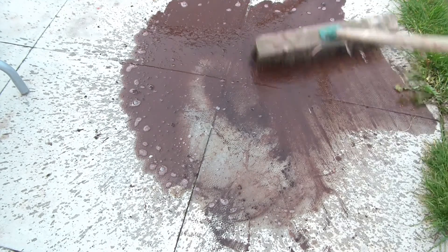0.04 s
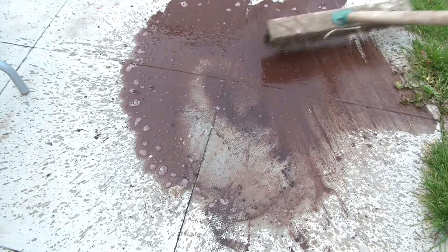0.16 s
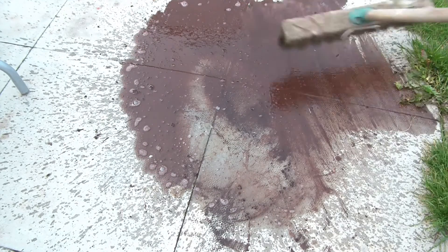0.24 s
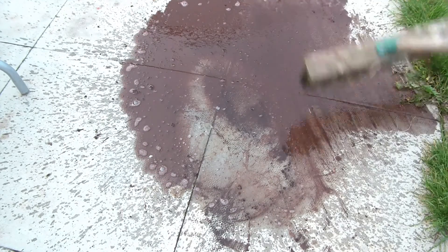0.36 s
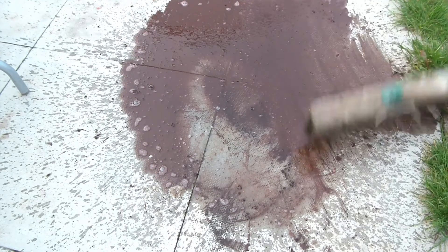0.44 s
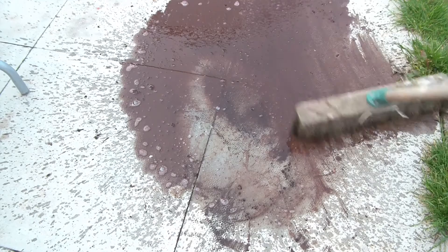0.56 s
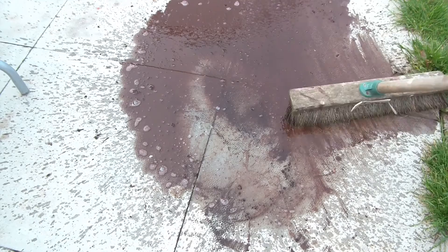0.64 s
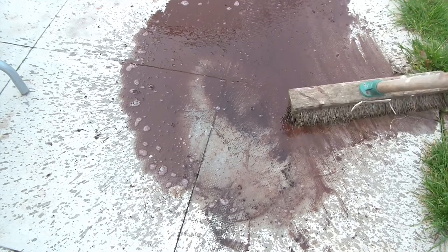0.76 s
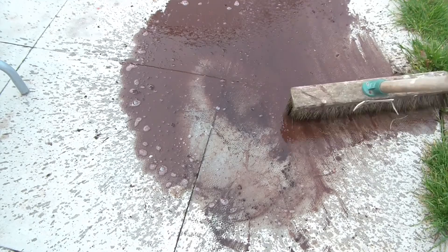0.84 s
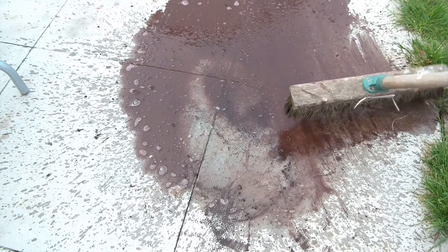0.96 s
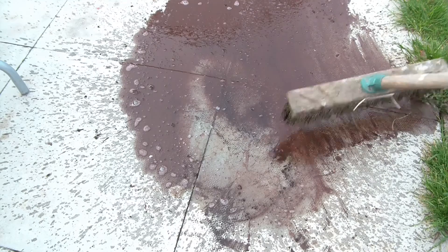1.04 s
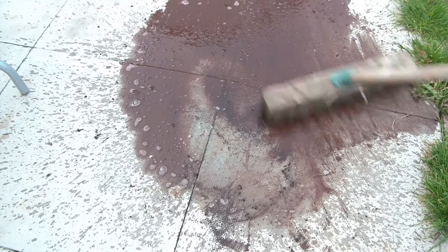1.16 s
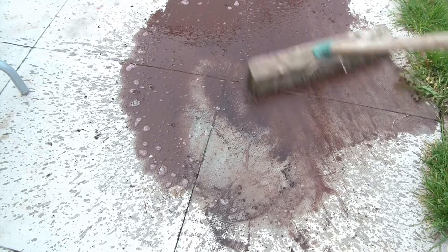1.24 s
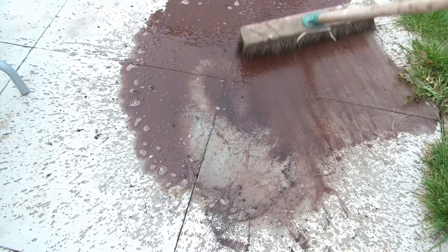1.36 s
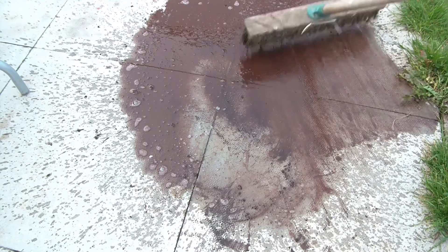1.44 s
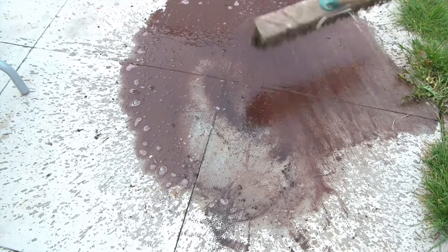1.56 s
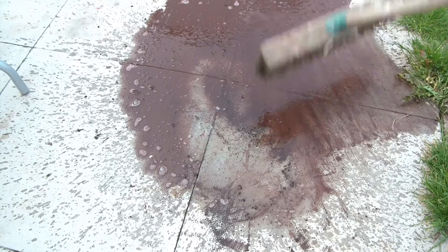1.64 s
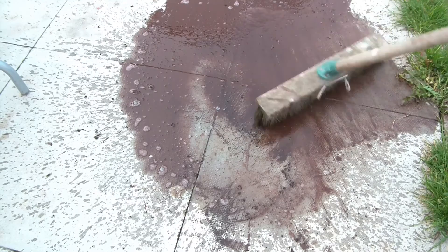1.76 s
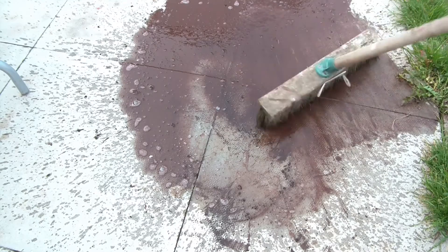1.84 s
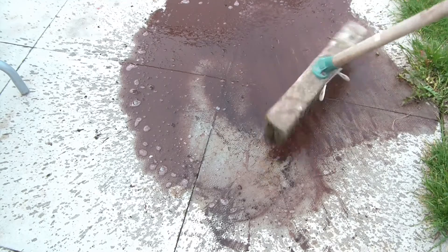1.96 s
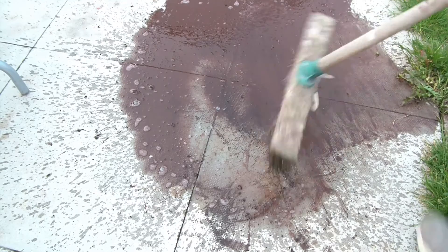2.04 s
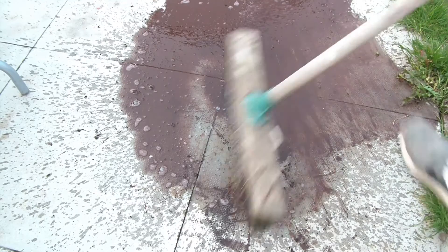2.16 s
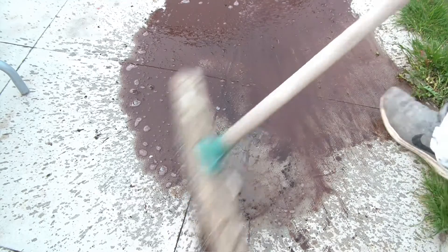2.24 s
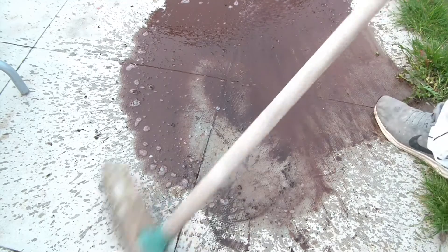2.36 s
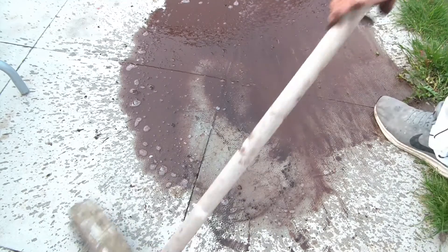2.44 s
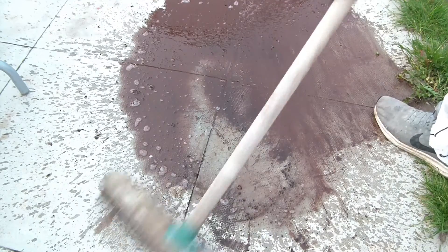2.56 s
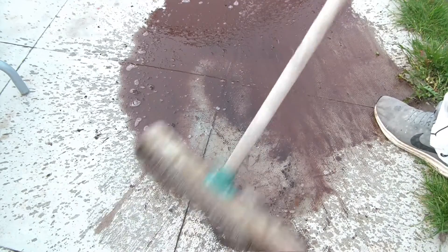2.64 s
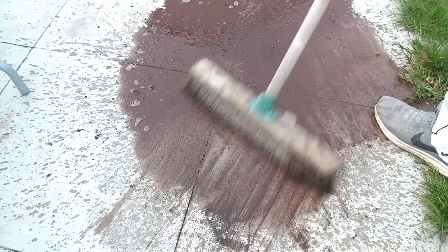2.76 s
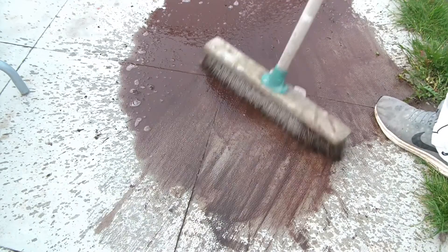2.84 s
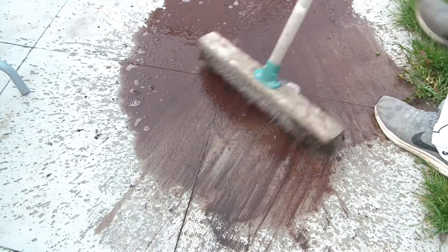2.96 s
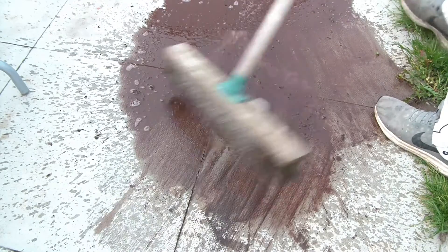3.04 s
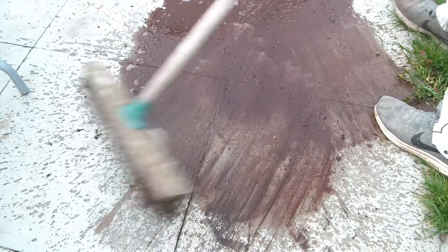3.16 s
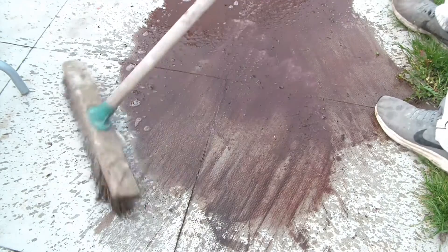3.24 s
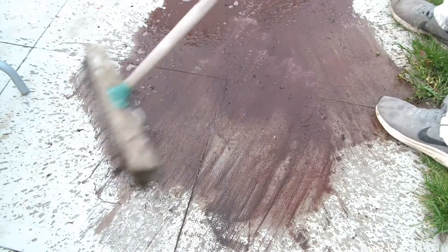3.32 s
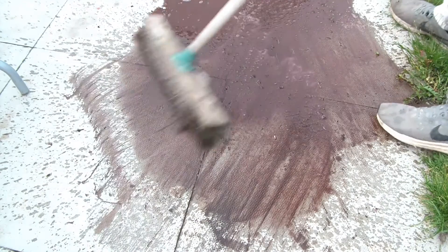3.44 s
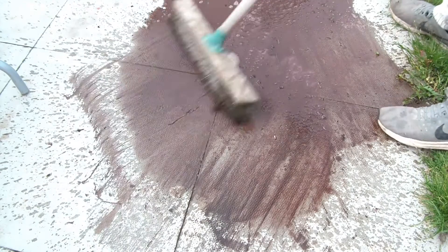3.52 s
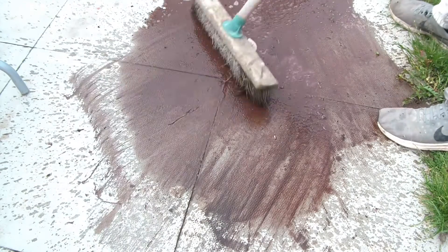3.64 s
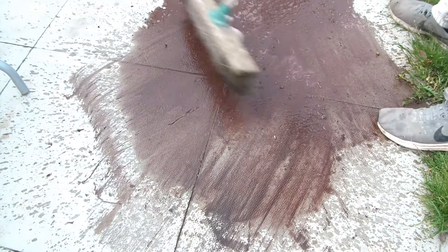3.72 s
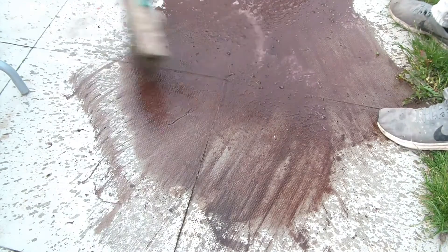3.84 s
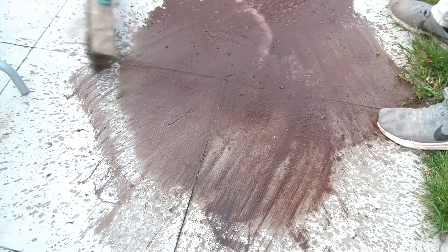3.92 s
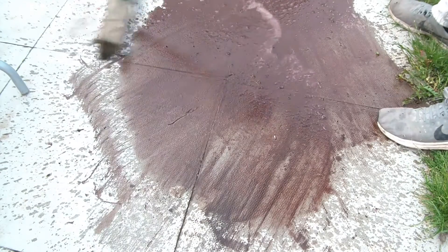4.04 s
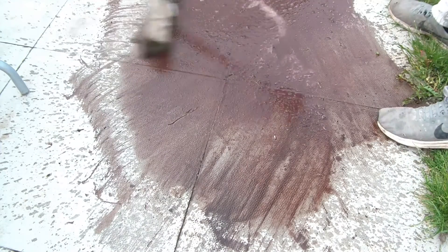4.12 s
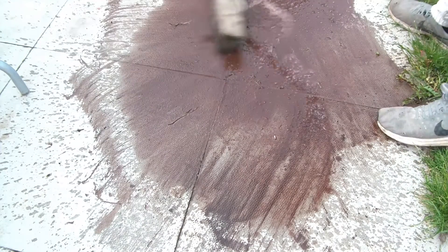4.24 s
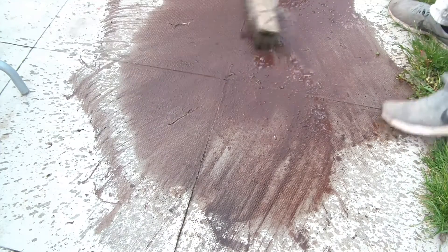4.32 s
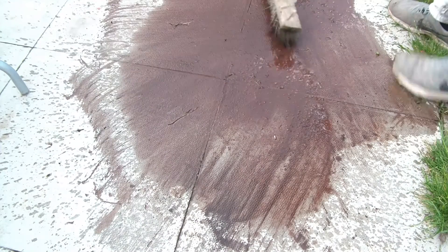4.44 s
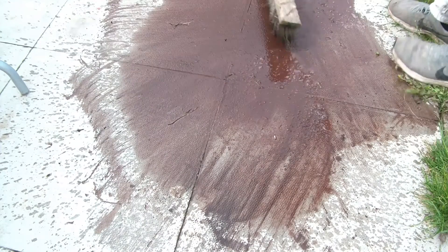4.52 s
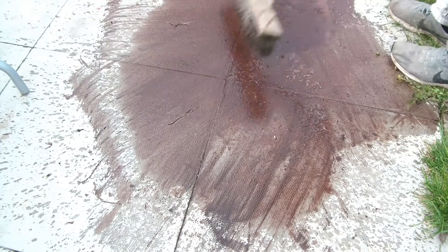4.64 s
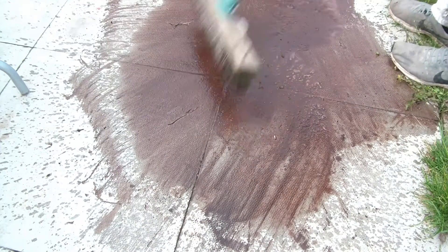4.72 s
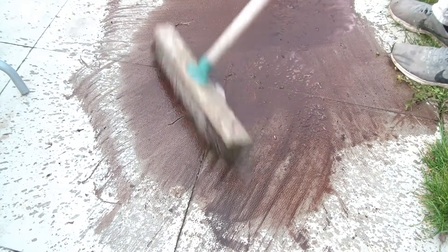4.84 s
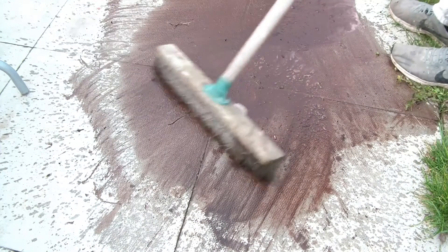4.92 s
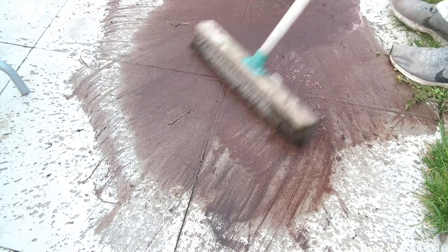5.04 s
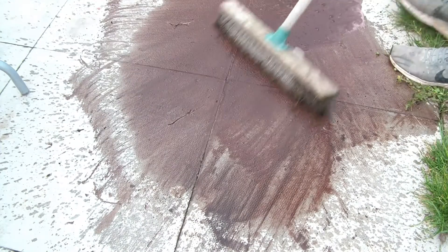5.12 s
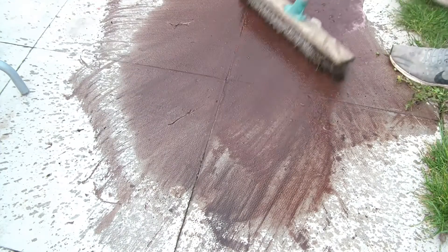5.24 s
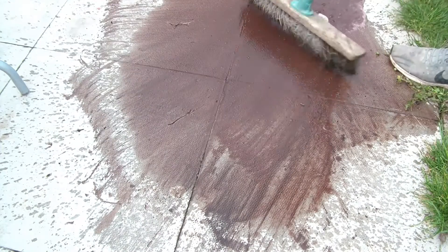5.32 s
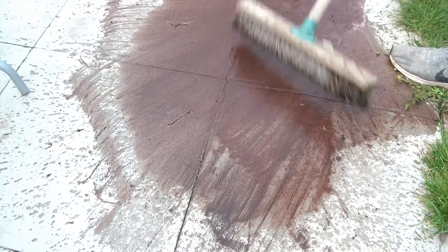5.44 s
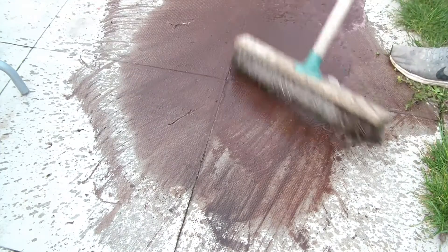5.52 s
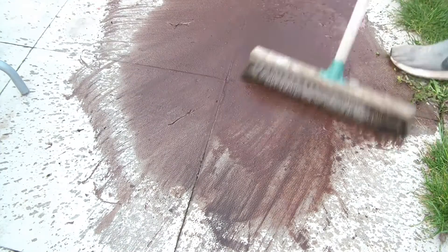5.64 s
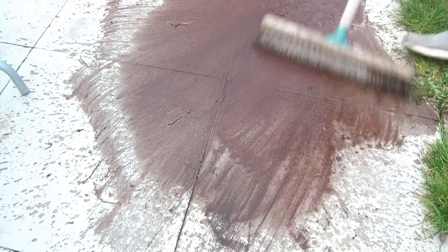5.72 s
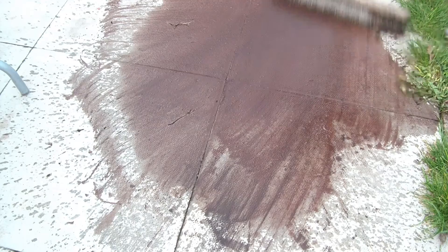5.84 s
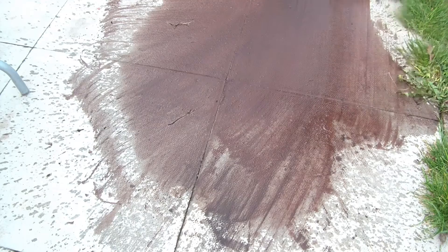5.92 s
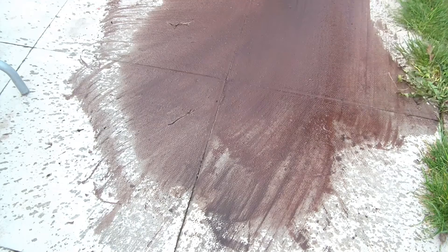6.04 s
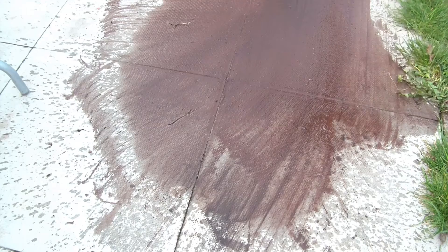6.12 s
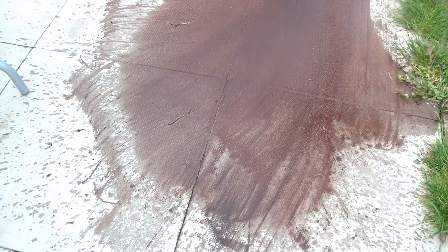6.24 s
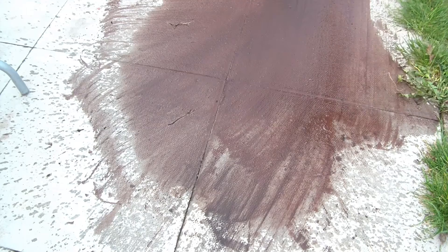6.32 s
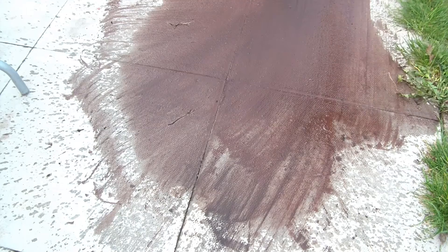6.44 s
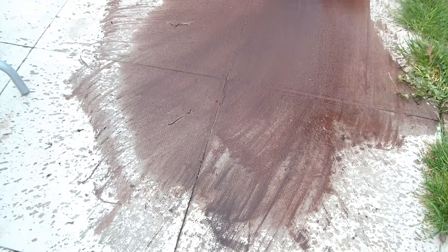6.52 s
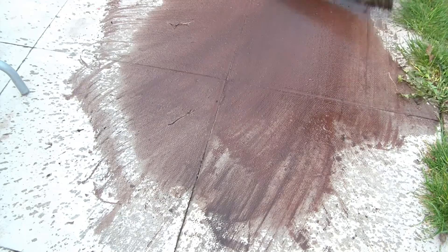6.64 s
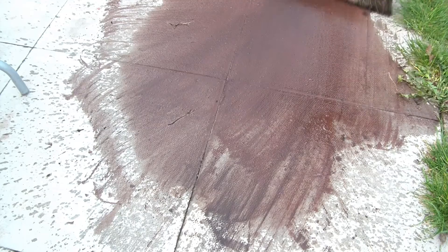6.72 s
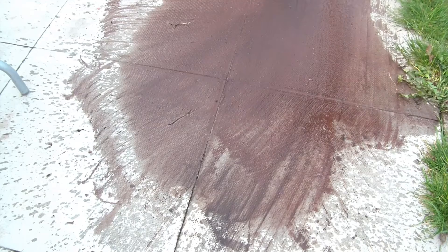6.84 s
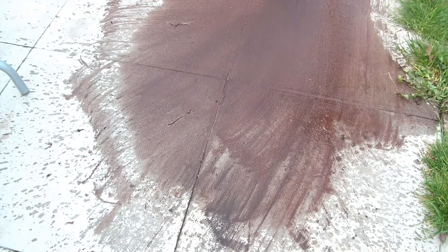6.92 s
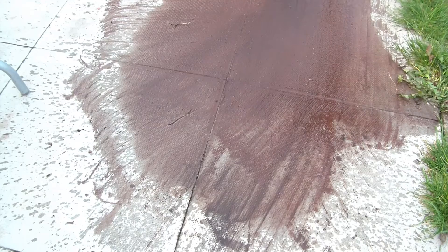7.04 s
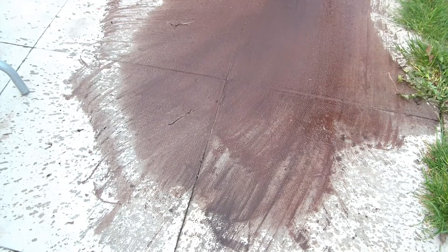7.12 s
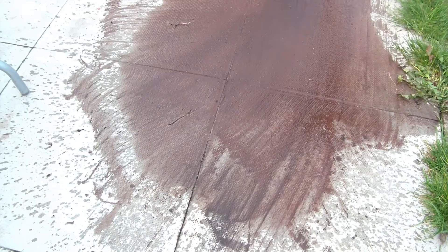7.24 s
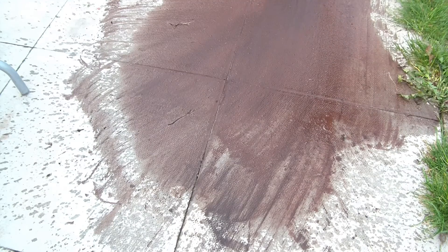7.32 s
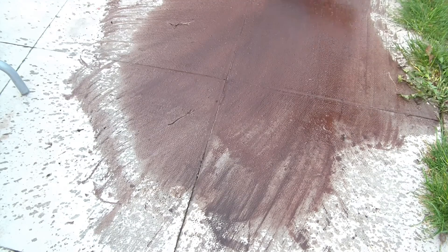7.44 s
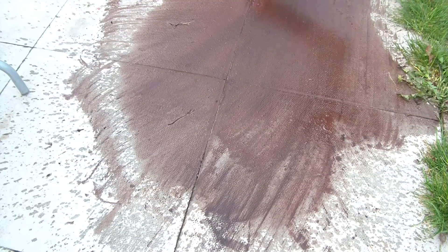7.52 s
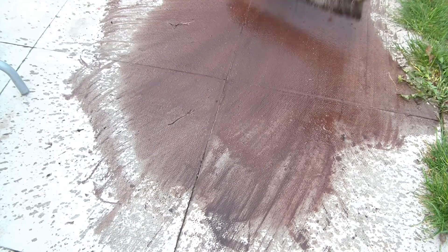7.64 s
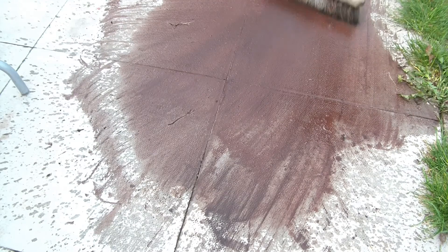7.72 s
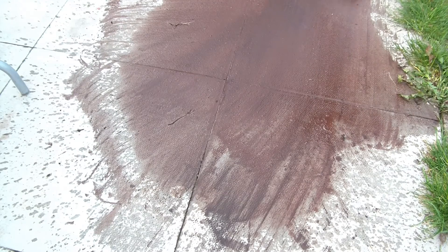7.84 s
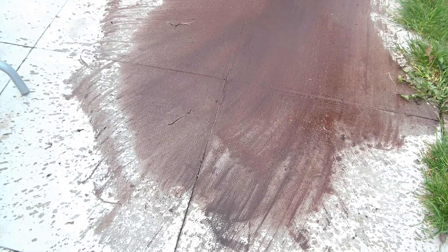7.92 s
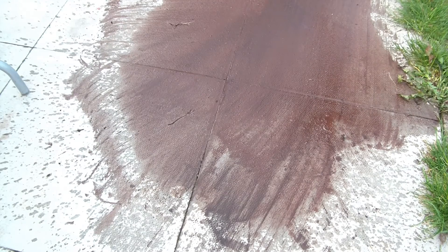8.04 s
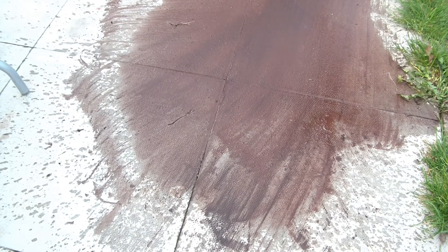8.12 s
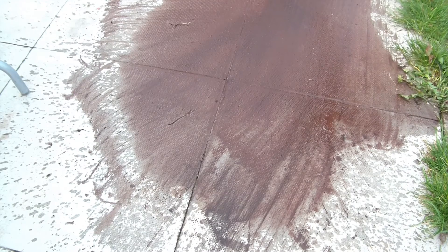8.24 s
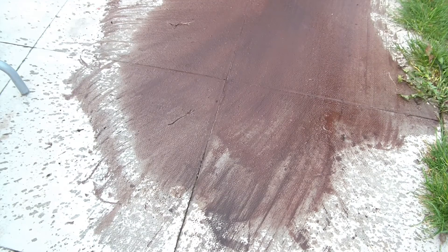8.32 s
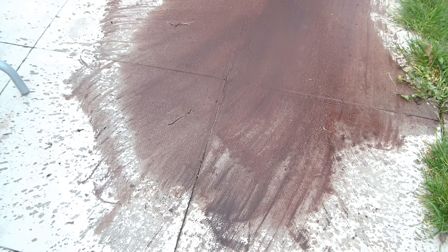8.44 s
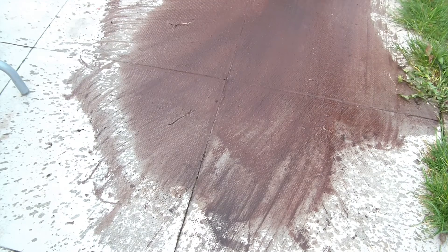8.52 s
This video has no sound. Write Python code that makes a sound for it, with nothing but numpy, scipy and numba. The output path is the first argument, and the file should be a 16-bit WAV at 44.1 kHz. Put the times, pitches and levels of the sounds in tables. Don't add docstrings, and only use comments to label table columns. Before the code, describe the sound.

Outdoors, a stiff broom scrubs wet concrete a metre or two from a hand-held stereo microphone. A stroke is already rasping at 0 s, with a short falling wooden squeak. A loud slap and knock hit at 0.6 s, a softer one at 1.24 s with a long scrub, then the hardest crack and thud at 1.84 s. Drops and grit tick from 2.1 to 2.5 s. Full bristly strokes swell from about 2.6, 3.4, 4.1, 5.0, 5.75, 5.9, 6.8 and 7.8 s, most starting with a small clack or wet slap, the 4.1 s knock sharper, and fading into watery hiss. The head sings faintly near 4.2 and 6 s. Distant traffic rumbles, strongest at the start; far engines hum around 3.5-4 s and rise in pitch at 6-7.3 s. A thin high whine continues, gaining a higher tone after 6.3 s. A last tick comes at 8.5 s.

```python
import sys
import numpy as np
from scipy import signal
from scipy.io import wavfile
from scipy.ndimage import uniform_filter1d
from numba import njit

SR = 44100
rng = np.random.default_rng(int(sys.argv[2]) if len(sys.argv) > 2 else 0)


def linear_from_db(decibels):
    return 10 ** (np.asarray(decibels, float) / 20)


def master(y):
    cut = np.clip(np.atleast_2d(y).T, -1, 1)
    pcm = np.round(cut * 32767)
    wavfile.write(sys.argv[1], SR, pcm.astype(np.int16))


N = 377937


def level(x, db):
    return x * linear_from_db(db) / np.sqrt(np.mean(x ** 2))


def band(x, hz, width):
    return signal.lfilter(*signal.iirpeak(min(hz, .45 * SR), hz / width, fs=SR), x)


def double_band(x, hz, width):
    return band(band(x, hz, width), hz, width)


def high_pass(x, order, hz):
    return signal.sosfilt(signal.butter(order, hz, "high", fs=SR, output="sos"), x)


def walk(rate):
    knots = rng.standard_normal(int(N / SR * rate) + 3)
    fine = np.convolve(np.repeat(knots, 8), np.bartlett(17) / 8, "same")
    return 1.3 * np.interp(np.arange(N) * (8 * rate / SR), np.arange(len(fine)), fine)


def stereo(mid, side_db, above_hz):
    sway_hz = above_hz / 12 * (1 + .3 * walk(30))
    sway = np.sin(2 * np.pi * np.cumsum(sway_hz) / SR)
    side = high_pass(mid * sway * np.sqrt(2), 6, above_hz)
    return linear_from_db(side_db) * side * np.array([[1], [-1]])


def whine():
    # f/Hz, level/dB
    lines = [
        (9001, -65),
        (13404, -60.5),
    ]
    t = np.arange(N) / SR
    low, high = [linear_from_db(db + 1.5 * walk(20)) * np.sin(2 * np.pi * hz * t) for hz, db in lines]
    return linear_from_db(2.5) * low + (t > 6.3) * linear_from_db(-3) * high


def road(duck_db):
    # f/Hz, spectral level/dB per Hz
    spectrum = [(15, -38), (25, -9), (50, 3), (101, -2), (140, -4), (173, -3.5), (495, -7), (895, 2.5),
                (1490, -8), (1650, -1.5), (2420, -42.5), (3170, -26), (8350, -28.5), (13900, -24),
                (15500, -41)]
    # t/s, level/dB
    traffic = [
        (0, 11.5),
        (.6, -1.5),
        (2, -0.3),
        (3.7, 1),
        (4.6, -0.7),
        (5.6, 0.5),
        (6, -1.5),
        (7.8, -2),
        (8.57, -3),
    ]
    road_hz, road_db = np.transpose(spectrum)
    busy_db = np.interp(np.arange(N) / SR, *np.transpose(traffic))
    rumble_db = 1.8 * duck_db + 1.8 * busy_db
    roar_db = 0.18 * duck_db + 0.8 * busy_db / 2
    rumble_db, roar_db = rumble_db - rumble_db.mean(), roar_db - roar_db.mean()
    out = 0
    for hz in 28 * 2 ** np.arange(0, 9.2, .5):
        noise = double_band(rng.standard_normal(N), hz, hz / 1.7)
        swell_db = rumble_db if hz < 100 else roar_db * (hz < 1400)
        band_db = np.interp(np.log(hz), np.log(road_hz), road_db)
        out = out + linear_from_db(band_db + swell_db + 1.1 * walk(5)) * noise
    out = level(out, -36.5)
    return out + stereo(out, side_db=-2.5, above_hz=2530) + stereo(out, side_db=-16.5, above_hz=15)


def engine():
    # t/s, firing tone f/Hz, level/dB
    engines = [
        [(3.45, 124, -53), (3.518, 127, -59), (3.962, 131.6, -38.5), (4.05, 125, -51)],
        [(5.9, 129.6, -57), (6.082, 131.8, -56), (6.37, 136.5, -46), (6.636, 143.3, -47.5),
         (7.198, 151.7, -48.5), (7.3, 154, -55)],
    ]
    out, t = 0, np.arange(N) / SR
    for s, hz, db in map(np.transpose, engines):
        fade = np.clip(np.minimum(t - s[0], s[-1] - t) / 0.18, 0, 1)
        phase = 2 * np.pi * np.cumsum(np.interp(t, s, hz) + 1.38 * walk(15)) / SR
        out = out + fade * linear_from_db(np.interp(t, s, db) + 1.5) * np.sin(phase)
    return out


def ticks():
    # t/s, peak level/dB, f/Hz
    drops = [(0.3336, -33, 4063), (2.1016, -25, 3400), (2.177, -33, 3500), (2.2165, -36, 3490),
             (2.424, -31, 3220), (2.4314, -31, 3320), (2.4763, -32, 3200), (2.499, -26, 3260),
             (2.5064, -26, 3000), (2.5157, -32, 4870), (2.5257, -27, 3480), (3.252, -36, 3170),
             (4.8047, -30.5, 3700), (4.849, -24, 3540), (4.88, -38, 3070), (5.464, -30, 3510),
             (7.3964, -43, 3100), (7.4354, -36, 6420), (7.446, -30, 10200), (7.4699, -29, 8140),
             (7.5264, -40, 4120), (7.5557, -45, 9000), (8.505, -27.5, 4970)]
    out, t = np.zeros(N + 1024), np.arange(1024) / SR
    for s, db, hz in drops:
        burst = rng.standard_normal(len(t)) * linear_from_db(-60 * t / .012)
        tick = double_band(burst, hz, hz)
        out[int(s * SR):][:len(t)] += linear_from_db(db) * tick / np.abs(tick).max()
    return out[:N]


def slaps():
    # t/s, peak level/dB, length/s, centre f/Hz, spray level/dB
    smacks = [(0.595, 3, 0.012, 3400, -8.5), (1.229, -3.5, 0.0093, 2960, -29),
              (1.2377, -1, 0.0046, 2620, -4.5), (1.837, 8, 0.0075, 3300, -9), (1.840, -3, .012, 1480, -7),
              (2.545, -22, 0.024, 2400, -12), (2.574, -6, 0.013, 2920, -6), (3.375, -7.5, 0.031, 2750, -13),
              (3.387, -12.5, 0.03, 1340, -17), (4.091, -17.5, 0.01, 2160, -13),
              (4.113, -12.5, 0.03, 2330, -7), (4.986, -18.5, 0.034, 2510, -11),
              (5.0260, -12, 0.013, 2410, -13), (5.74, -21, 0.033, 2720, 7), (6.775, -25, 0.036, 3000, -0.5),
              (6.829, -30, 0.019, 2900, -7), (7.827, -11, 0.029, 3150, 3)]
    out, t = np.zeros(N + 8192), np.arange(8192) / SR
    for s, db, length, hz, spray_db in smacks:
        push = rng.standard_normal(len(t)) * (t / length) * np.exp(-5 * t / length)
        slap = double_band(push, hz, hz)
        spray = band(push, 9100, 4700)
        burst = slap / np.abs(slap).max() + linear_from_db(spray_db) * spray / np.abs(spray).max()
        out[int(s * SR):][:len(t)] += linear_from_db(db) * burst
    return out[:N]


def head_knocks():
    # f/Hz, level/dB, decay t60/s
    modes = [(91, -11, 0.18), (146, 1, 0.046), (211, -3.5, 0.09), (296, 4, 0.027), (357, 0.5, 0.046),
             (456, -1.5, 0.025), (600, -8, 0.039), (1062, 11.5, 0.022), (1560, -6.5, 0.058),
             (2150, -11.5, 0.036)]
    # t/s, peak level/dB, ring f/Hz, decay t60/s, thud level/dB
    clacks = [(0.5953, -4, 1770, 0.01, -41), (0.5991, -2, 820, 0.0036, -5), (1.2329, -21, 3080, 0.011, -21),
              (1.2380, -8.5, 940, 0.0059, -8), (1.8389, -6.5, 1560, 0.04, 3.3),
              (1.8403, -6, 1040, 0.0092, -30), (1.857, -34, 1200, .02, -20), (2.5722, -9, 1840, 0.011, -30),
              (2.5760, -2.5, 1124, 0.017, -28), (3.3920, -19, 1100, 0.031, -31),
              (4.1215, 1.5, 2150, 0.01, -23.5), (5.0290, -17, 970, 0.02, -29),
              (5.7400, -18, 1010, 0.043, -24), (5.7880, -20.5, 1000, 0.021, -36),
              (6.828, -17, 1520, 0.022, -25), (7.8280, -20, 1020, 0.072, -22),
              (7.833, -18, 1390, 0.023, -47), (3.3830, -30, 2220, .02, -29)]
    out, t = np.zeros(N + 8192), np.arange(8192) / SR
    thud = sum(linear_from_db(db) * np.sin(2 * np.pi * hz * t) * linear_from_db(-60 * t / t60) for hz, db, t60 in modes)
    thud = high_pass(thud, 3, 55)
    thud = linear_from_db(2.5) * thud / np.abs(thud).max()
    for s, db, hz, t60, thud_db in clacks:
        soft_start = np.minimum(t / 0.00087, 1)
        ring = np.sin(2 * np.pi * hz * t) * linear_from_db(-60 * t / t60) * soft_start
        out[int(s * SR):][:len(t)] += linear_from_db(db) * ring / np.abs(ring).max() + linear_from_db(thud_db) * thud
    return out[:N]


@njit
def svf(x, g, k):
    y, b, l = np.empty(len(x)), 0., 0.
    for i in range(len(x)):
        v = (b + g[i] * (x[i] - l)) / (1 + g[i] * (g[i] + k[i]))
        b, l, y[i] = 2 * v - b, l + 2 * g[i] * v, k[i] * v
    return y


def snaps(per_s, spread_db):
    go = rng.random(N) < per_s / SR
    size_db = spread_db * np.minimum(rng.exponential(size=N), 4)
    return go * rng.choice([-1., 1.], N) * linear_from_db(size_db)


def bristles(centre, modes, per_s, spread_db, patchy_db):
    clicks, ring = snaps(per_s, spread_db), 0
    for place, width, db in modes:
        hz = place * centre
        clicks = np.roll(clicks, 50021)
        g, k = np.tan(np.pi * hz / SR), 1.5 * width / hz
        tone = svf(svf(clicks, g, k), g, k)
        ring = ring + linear_from_db(db + patchy_db * walk(35)) / np.sqrt(width) * tone
    return level(ring, 0)


def singing():
    # t/s, length/s, start f/Hz, end f/Hz, level under the scrub/dB
    notes = [
        (0.0, 0.12, 2350, 2280, -11.5),
        (1.28, 0.35, 2250, 2280, -14),
        (3.44, 0.26, 2200, 2130, -15),
        (4.13, 0.4, 2200, 2150, -9.5),
        (5.998, .23, 2150, 1910, -8),
        (6.93, 0.19, 1630, 1900, -19.5),
        (7.9, 0.22, 2110, 1970, -19),
    ]
    t, (s, length, hz0, hz1, db) = np.arange(N) / SR, np.transpose(notes)
    hz = np.interp(t, np.ravel([s, s + length], "F"), np.ravel([hz0, hz1], "F"))
    swell = 0
    for start, last, note_db in zip(s, length, db):
        swell = swell + linear_from_db(note_db) * np.sin(np.pi * np.clip((t - start) / last, 0, 1)) ** 0.52
    return swell * bristles(hz, [(1, 150, 0)], per_s=3000, spread_db=3, patchy_db=1.5)


def motion():
    # touch t/s, rise/s, hold/s, lift/s, sag over the hold/dB
    strokes = [(0.0, .045, .073, .112, 1), (.613, .068, .071, .029, 6), (.897, .068, .024, .143, 4),
               (1.243, .148, .09, .067, 8), (1.854, .025, .049, .188, 7), (2.212, .14, .048, .17, 4),
               (2.543, .014, .014, .045, 1), (2.625, .23, .131, .08, 11), (3.385, .19, .141, .076, 9),
               (4.08, .012, .014, .035, 5), (4.127, .243, .127, .115, 6), (4.57, .02, .036, .02, 0),
               (5.02, .1, .165, .111, -5), (5.6, .103, .012, .03, 2), (5.742, .13, .051, .048, 3),
               (5.9, .063, .241, .15, 1.5), (6.83, .109, .203, .15, 5), (7.83, .1, .305, .116, 9)]
    # peak level/dB, drop at touch/dB, wet hiss at touch/dB, wet hiss at lift/dB, head drag/dB
    pushes = [(-10.5, 9, 1, -1.3, -11), (-28, 12, 0.7, 5.5, -0.5), (-29, 29, 13, -1.8, -10.5),
              (-15.5, 10, 4.5, 2.5, -9), (-24, 11, 5, -6.5, -0.5), (-42.5, 7.5, 1, -7, 2),
              (-32.5, 16, -1, -2, -2.5), (-12, 19.5, 5, 1, -13.5), (-13.5, 18, 3, 0.5, -12.5),
              (-36.5, 18, -13, -2, 0), (-15, 19.5, 9.5, -4, -10), (-37, 6, 0.7, -5, 3),
              (-20.5, 17, 10.5, 0.5, -10.5), (-38, 24, -7, 2, -7), (-15.5, 10, 9.5, 4, -12.5),
              (-14.5, 5, -1, -2, -9.5), (-13.5, 15, 6.5, -0.5, -16.5), (-17, 7.5, 7, 4, -11.5)]
    # scrub f/Hz, drag f at touch/Hz, drag f at lift/Hz, drag gained/dB
    bends = [(4660, 2100, 2640, 0.3), (4370, 1700, 2030, -3.5), (4370, 1900, 2400, 5.5),
             (4680, 1780, 2550, -4.3), (4200, 1800, 1900, -9.3), (4060, 1500, 1600, -8),
             (4200, 2000, 1950, 9.5), (4430, 1500, 2040, -5.5), (4420, 2100, 2170, -2.1),
             (4400, 1800, 2000, -3), (4740, 2140, 2260, 1.6), (4160, 1600, 1900, -1),
             (4300, 1940, 2210, 1.8), (4330, 2100, 2100, -1), (4300, 1540, 3050, -2.5),
             (4500, 2100, 2200, -1.4), (4530, 1830, 2280, -0.5), (4650, 2000, 2150, -6.3)]
    t = np.arange(0, N / SR, .001)
    touch, rise, hold, lift, sag = np.transpose(strokes)[:, :, None]
    peak, under, wet0, wet1, drag = np.transpose(pushes)[:, :, None]
    scrub_hz, drag0, drag1, gained = np.transpose(bends)[:, :, None]

    def part(start, length):
        return np.clip((t - start) / length, 0, 1)

    def fine(v):
        return np.interp(np.arange(N) / SR, t, v)

    leave = touch + rise + hold
    light = under * (1 - part(touch, rise)) ** 1.3 + sag * part(touch + rise, hold) ** 1.15
    way, off = part(touch, rise + hold), part(leave, lift)
    landing = 1500 * np.maximum(touch - t, 0)
    draining = 118 * np.maximum(t - leave - lift, 0)
    fall = landing + light + 24 * off ** 1.4 + draining
    power = linear_from_db(peak - np.minimum(fall, 200)) ** 2
    share = power / power.sum(axis=0)
    hiss_db = wet0 * part(touch, 0.029) + (wet1 - wet0) * way
    hiss_db = hiss_db + 4 * np.sin(np.pi * off) - 2 * off ** 2
    drag_db = drag + gained * way + np.minimum(0.92 * light, 21)
    colour = hiss_db, drag_db, scrub_hz, drag0 + (drag1 - drag0) * way
    resting = linear_from_db(-62.5 + 3.5 * walk(16))
    gain = np.hypot(fine(np.sqrt(power.sum(axis=0))), resting)
    return gain, *(fine((share * c).sum(axis=0)) for c in colour)


def broom():
    # f over the moving centre, width/Hz, level/dB
    scrub_modes = [
        (.76, 1150, 5),
        (0.998, 1260, 9.5),
        (1.22, 1020, 3.5),
    ]
    # f/Hz, width/Hz, level/dB
    hiss_modes = [
        (7480, 2400, 6),
        (9450, 3750, 10),
        (13100, 12000, 10),
        (13700, 4800, -9.5),
    ]
    # f over the moving centre, width/Hz, level/dB
    drag_modes = [
        (.58, 644, 4.1),
        (.8, 506, 10.2),
        (1.05, 740, 13.5),
        (1.3, 614, 11.1),
    ]
    gain, hiss_db, drag_db, scrub_hz, drag_hz = motion()
    judder = linear_from_db(.7 * walk(60) + .6 * walk(22))
    scrub = bristles(scrub_hz, scrub_modes, per_s=10000, spread_db=2.5, patchy_db=.9)
    hiss = linear_from_db(hiss_db) * bristles(np.ones(N), hiss_modes, per_s=20000, spread_db=1.5, patchy_db=.7)
    drag = bristles(drag_hz, drag_modes, per_s=8000, spread_db=2.5, patchy_db=1.2)
    tips = high_pass(scrub + hiss, 4, 2400)
    head = high_pass(drag, 4, 750)
    return gain * judder * (tips + linear_from_db(drag_db) * head + singing())


def scene():
    near = broom() + slaps() + head_knocks() + ticks()
    loud = uniform_filter1d(np.clip(near, -1, 1) ** 2, 14001, origin=7000)
    duck = (1 + (loud / linear_from_db(-13) ** 2) ** 2) ** -.4
    near = near + linear_from_db(-18) * np.pad(near, (int(.0043 * SR), 0))[:N]
    wide = stereo(near, side_db=-6.5, above_hz=4700)
    far = road(20 * np.log10(duck)) + engine()
    return near + wide + duck * far + whine()


def low_pass(x):
    return signal.sosfilt(signal.butter(12, 16290, fs=SR, output="sos"), x)


def record(dry):
    left = linear_from_db(0.7) * signal.lfilter([1 - .14, .14], [1], dry[0])
    top_cut = signal.ellip(10, .2, 70, 15350, fs=SR, output="sos")
    dull = signal.sosfilt(top_cut, [left, dry[1]])
    return low_pass(np.clip(dull, -1, 1))


dry = scene()
out = record(dry)
master(out)
```